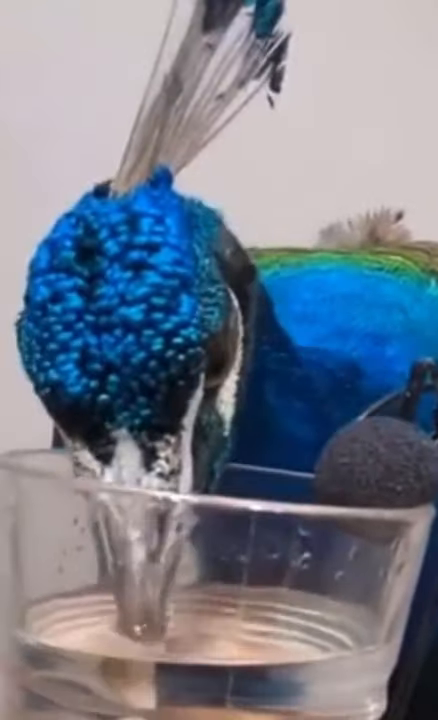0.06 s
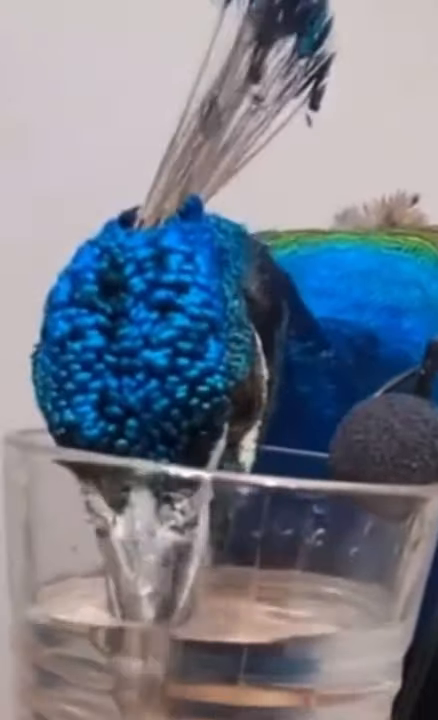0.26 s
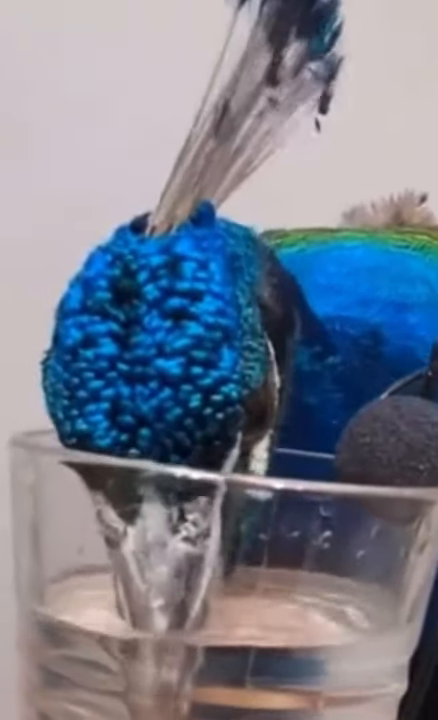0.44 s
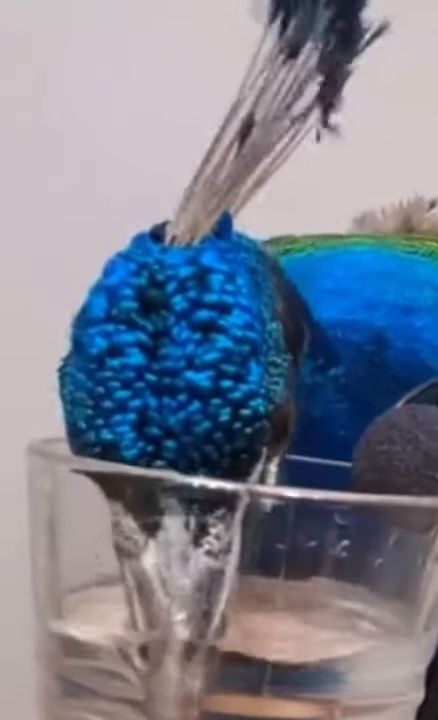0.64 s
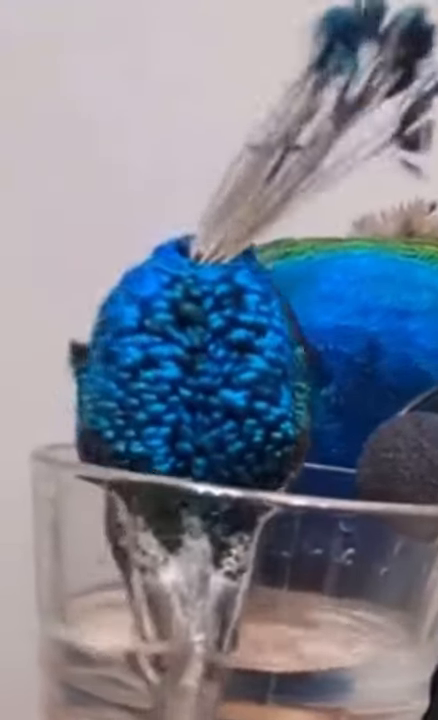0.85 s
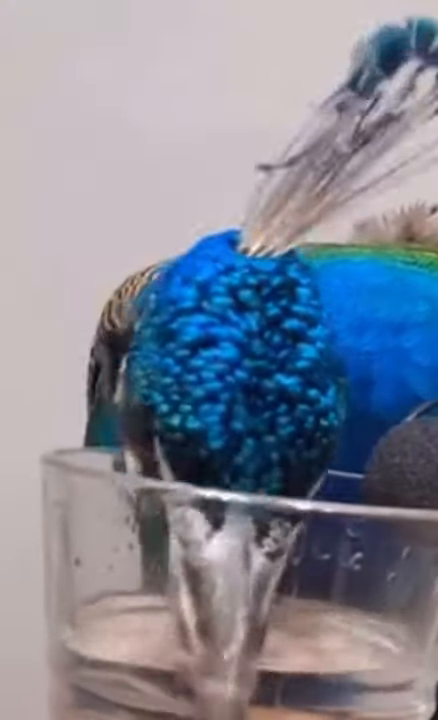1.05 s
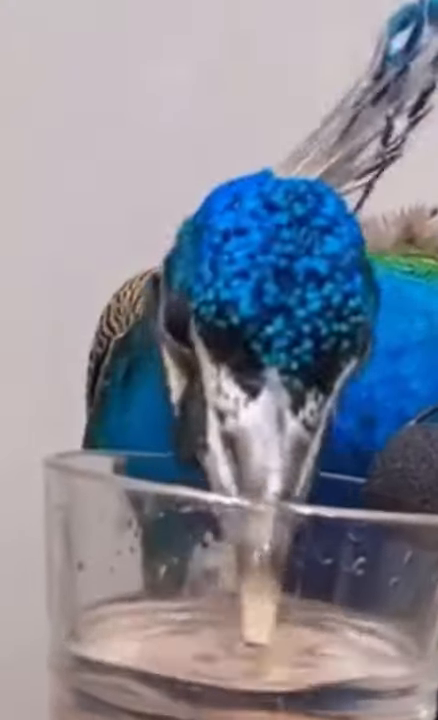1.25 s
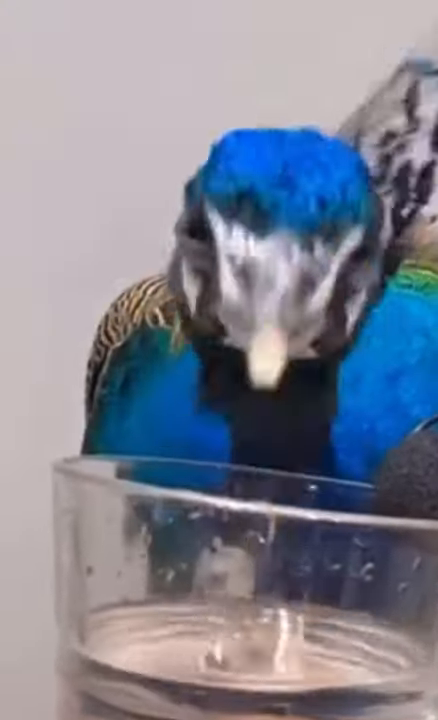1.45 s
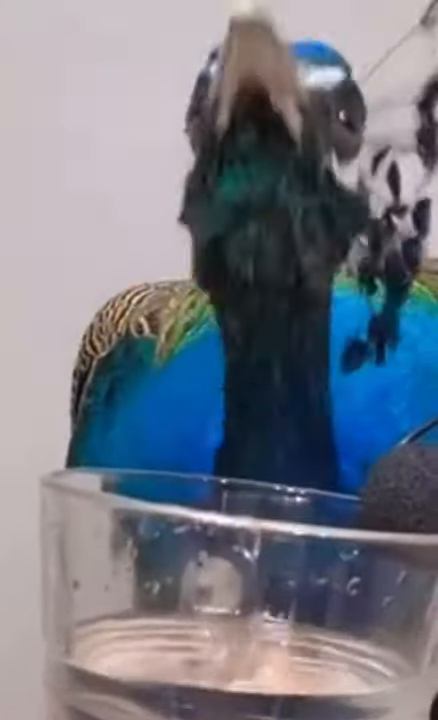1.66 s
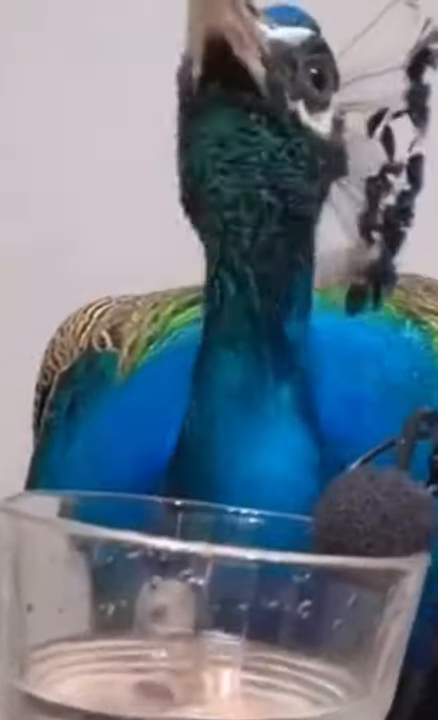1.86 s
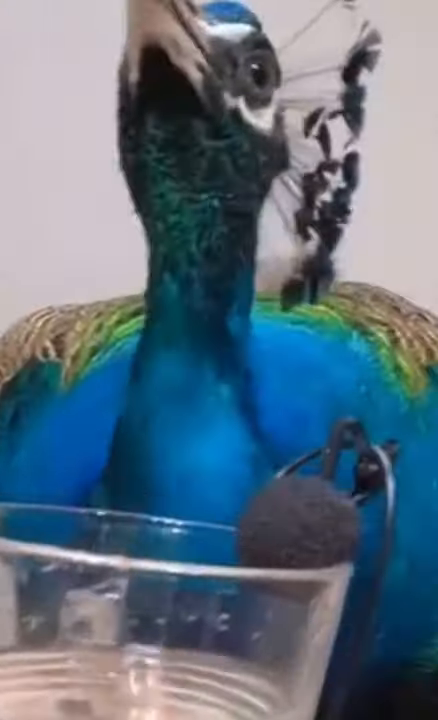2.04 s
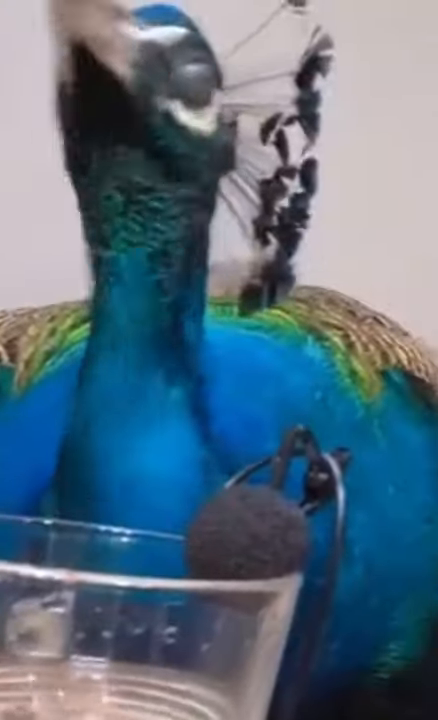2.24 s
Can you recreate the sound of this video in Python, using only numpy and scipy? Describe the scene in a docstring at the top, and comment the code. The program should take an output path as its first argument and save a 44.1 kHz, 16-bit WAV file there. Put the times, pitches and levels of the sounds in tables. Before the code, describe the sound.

Close, rapid wet clicking of a peacock sipping water from a glass, followed by fading gulps.

```python
"""A peacock drinks from a glass, close by, over a low rumble and faint hiss. First its beak works in the
water about ten times a second: snapping water films set the mouth ringing with sharp clicks, and short
swishes of grainy noise swell and fade around them. Soon water squeaks through a narrow gap, and now
and then the beak taps the glass into vibration. Then the bird lifts its head and swallows in fading
gulps, which sound at the lower resonance of the throat."""
import sys
import numpy as np
from scipy import signal
from scipy.fft import rfft, irfft
from scipy.io import wavfile

SR = 44100
rng = np.random.default_rng(int(sys.argv[2]) if len(sys.argv) > 2 else 0)


def materialize(psi):
    """Save the field psi as 16-bit PCM at rate SR to the path in sys.argv[1].

    A 1-D psi becomes a single channel; in a 2-D psi each row is a channel.
    """
    bounded = np.clip(np.atleast_2d(psi).T, -1, 1)
    quanta = np.round(bounded * 32767).astype(np.int16)
    wavfile.write(sys.argv[1], SR, quanta)


N = 101429

# Envelopes of the microphone rumble and the stirring water. Each row: time in seconds, level in dB.
RUMBLE_LEVELS = [(0, -46.5), (.3, -38.5), (.55, -44.5), (.72, -40), (1.3, -48), (1.6, -56), (2.3, -58)]
STIR_LEVELS = [(0, -60), (.18, -69), (.25, -59.5), (.39, -57), (.51, -57.5), (.75, -56), (1.15, -56),
               (1.33, -57.5), (1.42, -68), (2.3, -79.5)]
# Spectra of rumble, stirring water and room hiss. Each row: frequency in Hz, relative density in dB.
RUMBLE_SPECTRUM = [(15, 4), (30, 4), (55, -8.5), (100, -14), (200, -28.5), (400, -46.5), (1000, -49)]
STIR_SPECTRUM = [(100, 12), (500, -31), (900, 0.5), (1600, 4), (2400, -7.5), (4200, -14), (6000, -16.5),
                 (8000, -16), (13000, -35)]
HISS_SPECTRUM = [(100, 3), (220, -9.5), (350, -1), (520, -20.5), (1400, -12), (2800, -25.5), (10500, -26),
                 (13000, -27.5)]
# Bumps against the glass. Each row: peak time in seconds, frequency in Hz, level in dB.
BUMPS = [(.7, 55, -31), (.996, 60, -27), (1.189, 55, -27), (1.185, 130, -27), (1.291, 65, -35),
         (1.383, 120, -35)]
# Taps of the beak on the glass. Each row: start in seconds, level in dB.
TAPS = [(.6166, -35), (.7175, -39), (.8003, -39), (.889, -41), (.9041, -40), (.9973, -36), (1.188, -41)]
# Modes of the glass. Each list in turn: frequency in Hz, relative level in dB, 60 dB decay in seconds.
GLASS_HZ = [2050, 4870, 5150, 6130, 8650, 9380]
GLASS_DB = [-3.5, -2, -2.5, -10, -2, -5.5]
GLASS_T60_S = [.06, .05, .035, .04, .025, .036]
# Swallows. Each row: peak time, rise and fall in seconds, throat resonance in Hz, then the levels of
# throat, overtone and fizz in dB.
GULPS = [(1.406, 0.046, 0.034, 637, -45, -51, -63.5), (1.468, 0.021, 0.03, 784, -41, -48, -49.5),
         (1.492, 0.016, 0.031, 638, -35.5, -49, -81), (1.597, 0.038, 0.029, 625, -37.5, -56, -72.5),
         (1.7, 0.05, 0.049, 703, -45.5, -60.5, -74), (1.827, 0.032, 0.033, 793, -49, -53, -64.5),
         (1.974, 0.04, 0.024, 817, -48.5, -59.5, -63), (2.145, 0.022, 0.018, 820, -56, -65, -77)]
# Bursting water films. Each row: peak time in seconds, rise and equal fall in seconds, level in dB.
FILMS = [(0.199, 0.0037, -47.5), (0.756, 0.021, -50.5), (1.137, 0.0063, -54.5), (1.251, 0.023, -47.5),
         (1.538, 0.006, -59), (1.641, 0.017, -55), (1.946, 0.013, -64)]
# Squeaks of water. Each row: peak time in seconds, rise and equal fall in seconds, resonance in Hz,
# half width as a share of that frequency, level in dB.
SQUEAKS = [(.453, 0.02, 3370, 0.03, -38), (.453, 0.02, 5040, 0.05, -41.5),
           (.565, 0.021, 6100, 0.064, -33.5), (.794, 0.014, 3550, 0.022, -40),
           (1.288, 0.019, 1960, 0.061, -36.5), (1.315, 0.061, 5370, 0.12, -53.5)]
# Single bubbles. Each row: start in seconds, frequency in Hz, 60 dB decay in seconds, level in dB.
BUBBLES = [(0.7857, 6280, 0.01, -28), (1.2456, 5600, 0.0043, -40), (1.3831, 1750, 0.0062, -26),
           (1.967, 832, 0.045, -46.5)]
# Bands of a click: knock, snap, tick and spray. Each row: lower and upper edge in Hz.
CLICK_BANDS = [(330, 990), (2350, 3760), (4900, 6600), (7700, 11100)]
# Short swishes of grainy noise that swell and fade around the clicks. Each row: peak time, rise and
# fall in seconds, centre in Hz, then the levels of the centre, bass, middle and three treble bands in dB.
SWISHES = [(0.01, 0.023, 0.046, 1750, -52, -66, -67, -61, -63, -64),
           (0.058, 0.013, 0.013, 1610, -49, -47.5, -50, -49.5, -54, -58),
           (0.099, 0.0094, 0.014, 1480, -44, -50, -54, -69, -72, -73),
           (0.134, 0.056, 0.044, 1730, -48.5, -73, -56, -60, -55.5, -66),
           (0.223, 0.025, 0.025, 1500, -41.5, -52, -59, -53, -77, -81),
           (0.274, 0.052, 0.023, 1750, -47.5, -54, -53, -62, -60, -70),
           (0.336, 0.0066, 0.025, 1490, -30, -42, -47, -52, -56, -66),
           (0.457, 0.021, 0.019, 1440, -23.5, -45, -68, -69, -60, -59),
           (0.476, 0.026, 0.019, 1230, -32.5, -45.5, -55, -59, -54.5, -51),
           (0.568, 0.027, 0.036, 1405, -32, -45, -47.5, -43, -53, -57),
           (0.587, 0.019, 0.018, 1380, -26.5, -59, -57, -41, -47.5, -67),
           (0.617, 0.0095, 0.018, 1480, -49, -35.5, -55, -59, -48, -63),
           (0.686, 0.037, 0.024, 1800, -38, -38, -50, -49, -51, -55),
           (0.719, 0.0078, 0.0077, 1600, -57, -36, -54, -53, -55, -77),
           (0.778, 0.013, 0.026, 1370, -33, -46, -72, -69, -51, -51),
           (0.798, 0.012, 0.024, 1610, -36.5, -34.5, -40.5, -39.5, -46, -52),
           (0.897, 0.025, 0.024, 1540, -36.5, -34.5, -49, -42.5, -45, -48),
           (0.993, 0.02, 0.021, 1620, -38, -34.5, -39, -44, -47, -49),
           (1.087, 0.026, 0.025, 1665, -25.5, -35, -37, -41.5, -43.5, -50),
           (1.191, 0.014, 0.023, 1600, -33, -32, -30, -59, -50.5, -51),
           (1.285, 0.029, 0.034, 1580, -37, -40.5, -35.5, -54, -51.5, -55)]
# Wet clicks of beak and tongue. Each row: start in seconds, mouth resonance in Hz, then the levels of
# ring, knock, snap, tick and spray in dB.
CLICKS = [(0.0437, 1190, -74, -66, -49, -50.5, -44.5), (0.0481, 980, -46.5, -55, -59, -55, -51),
          (0.1043, 1847, -41, -51, -51, -58, -71), (0.1299, 1420, -49, -53, -53, -44, -70),
          (0.2228, 1424, -31, -58, -59, -60, -69), (0.2336, 1570, -42.5, -46.5, -54, -63, -69),
          (0.2565, 1680, -47, -63, -46, -65, -72), (0.275, 1620, -40, -47.5, -75, -47.5, -62),
          (0.2966, 1870, -42.5, -70, -59, -54.5, -59), (0.3342, 1450, -27, -44.5, -64, -52, -57),
          (0.3386, 1670, -27.5, -56, -36.5, -41.5, -40.5), (0.3492, 1500, -52, -57, -49, -63, -64),
          (0.4177, 1580, -42.5, -52, -68, -71, -79), (0.46, 1373, -22.5, -41, -30, -41, -68),
          (0.5421, 1350, -43, -64, -58, -53, -72), (0.5731, 1476, -19, -45, -30, -21.5, -68),
          (0.5943, 1340, -25.5, -40, -37, -59, -67), (0.6164, 1510, -32.5, -34, -32.5, -57, -60),
          (0.6649, 2070, -27.5, -50, -46, -37.5, -59), (0.6774, 1640, -19.5, -55, -26.5, -27, -32.5),
          (0.6922, 1830, -35, -59, -55, -58, -62), (0.7008, 2160, -42, -64, -47, -68, -72),
          (0.7171, 1550, -28.5, -43.5, -37.5, -46, -49), (0.7825, 1600, -21, -54, -29, -27.5, -20.5),
          (0.7992, 1870, -31, -40, -28, -36.5, -43), (0.8904, 1700, -26.5, -55, -45, -38.5, -44),
          (0.904, 1970, -31.5, -37.5, -34.5, -64, -52), (0.9853, 1600, -26, -33.5, -32.5, -38.5, -50),
          (0.9963, 1170, -30, -36, -38.5, -41, -43.5), (1.0456, 1880, -38, -63, -48, -40.5, -52),
          (1.0488, 1730, -35.5, -67, -47.5, -63, -55), (1.0932, 1580, -20.5, -43.5, -36.5, -58, -62),
          (1.183, 1120, -25.5, -29, -36.5, -40.5, -54), (1.1876, 960, -27, -42, -51, -55, -46),
          (1.1954, 1590, -24.5, -48, -71, -59, -64), (1.2054, 1470, -35.5, -51, -61, -63, -68),
          (1.293, 1120, -33, -49, -69, -54, -60), (1.3843, 950, -22.5, -55, -58, -55.5, -55.5),
          (1.4727, 837, -26.5, -54, -63, -39, -57), (1.4924, 585, -25.5, -34.5, -85, -53.5, -75),
          (1.8283, 810, -43.5, -49, -60, -79, -67), (1.98, 820, -41, -54, -91, -66, -72),
          (2.2741, 1370, -42.5, -54, -60.5, -67, -75), (2.2905, 1390, -43, -49, -59.5, -63, -74)]

GRAINS_PER_S, GRAIN_SPREAD_DB, SMOOTH_SHARE = 3000, 2.5, 0.63
RING_CYCLES, RING_ATTACK_S, CHIRP_PER_S = 10.45, 0.00044, 4.2   # the mouth decays 60 dB in RING_CYCLES
KNOCK_T60_S, CRACK_T60_S, CRACKLE_SHARE = 0.012, 0.008, 0.087
MEAN_REBOUND_S, REBOUND_SHARE = .0007, 0.56


def from_db(db):
    """Amplitude grows tenfold with every 20 dB."""
    return 10 ** (np.asarray(db) / 20)


def rms_one(x):
    """Division by the rms value gives a signal unit power."""
    return x / np.sqrt(np.mean(x ** 2) + 1e-20)


def band(x, low, high, order=2):
    """A causal band-pass filter attenuates what lies outside its edges in Hz."""
    sections = signal.butter(order, [low, min(high, .45 * SR)], "band", fs=SR, output="sos")
    return signal.sosfilt(sections, x + 1e-18)


def around(hz, half_width):
    """The edges of a band lie at equal ratios below and above its centre."""
    return hz / (1 + half_width), hz * (1 + half_width)


def add(out, start_s, x):
    """Sounds superpose: x adds to out from start_s on."""
    i = int(round(start_s * SR))
    x, i = x[max(-i, 0):], max(i, 0)
    out[i:i + len(x)] += x[:max(N - i, 0)]


def level(curve):
    """Straight lines between (s, dB) points give a piecewise exponential envelope."""
    return from_db(np.interp(np.arange(N) / SR, *np.transpose(curve)))


def coloured(noise, spectrum):
    """Spectral weighting colours a steady noise; the result has unit power."""
    hz, db = np.transpose(spectrum)
    bin_hz = np.maximum(np.fft.rfftfreq(N, 1 / SR), 1)
    gain = from_db(np.interp(np.log(bin_hz), np.log(hz), db)) * (bin_hz > 10)
    return rms_one(irfft(rfft(noise) * gain, N))


def grains(size):
    """Tiny, uneven impulses form shot noise on top of a smooth noise."""
    strengths = from_db(GRAIN_SPREAD_DB * np.minimum(rng.exponential(1, size), 4))
    signs = rng.choice([-1, 1], size)
    present = rng.random(size) < GRAINS_PER_S / SR
    return rms_one(strengths * signs * present) + SMOOTH_SHARE * rng.standard_normal(size)


def swell(peak_s, rise_s, fall_s, bands):
    """An envelope 0.4 s long modulates grains in bands given as ((low Hz, high Hz), peak dB)."""
    t = np.arange(-SR // 5, SR // 5) / SR
    distance = np.where(t < 0, -t / rise_s, t / fall_s)   # 1 lies 20 dB below the peak
    envelope = from_db(-20 * distance ** 1.203)
    out = np.zeros(N)
    for edges, db in bands:
        noise = band(grains(len(t)), *edges) * envelope
        add(out, peak_s + t[0], from_db(db) * rms_one(noise) * np.sqrt(np.mean(envelope ** 2)))
    return out


def burst(x, db, hold_s=.004):
    """Energy is power times duration: a transient gets the energy of level db held for hold_s."""
    return from_db(db) * x * np.sqrt(hold_s * SR / np.sum(x ** 2))


def ring(t, hz, t60):
    """A small air pocket is a damped oscillator, here rising in pitch as it dies away."""
    phase = 2 * np.pi * hz * t * (1 + CHIRP_PER_S * t)
    attack = 1 - np.exp(-t / RING_ATTACK_S)
    return np.sin(phase) * from_db(-60 * t / t60) * attack


def background(hiss_db=-61, whine_hz=10460, whine_db=-80):
    """Stirring water, the rustle of the stretching neck, rumble, hiss and a faint whine superpose."""
    stir = level(STIR_LEVELS) * coloured(grains(N), STIR_SPECTRUM)
    rumble = level(RUMBLE_LEVELS) * coloured(rng.standard_normal(N), RUMBLE_SPECTRUM)
    rustle = swell(peak_s=1.98, rise_s=0.5, fall_s=0.3, bands=[((117, 417), -59.5)])
    whine = from_db(whine_db) * np.sin(2 * np.pi * whine_hz * np.arange(N) / SR)
    hiss = from_db(hiss_db) * coloured(rng.standard_normal(N), HISS_SPECTRUM)
    return stir + rustle + rumble + whine + hiss


def bumps(half_width_cycles=0.52):
    """A bump on the glass reaches the microphone as one low swing under a Gaussian envelope."""
    out, t = np.zeros(N), np.arange(N) / SR
    for peak_s, hz, db in BUMPS:
        cycles = (t - peak_s) * hz
        out += from_db(db) * np.cos(2 * np.pi * cycles) * np.exp(-(cycles / half_width_cycles) ** 2)
    return out


def glass_taps(spread_db=2):
    """An impact excites each normal mode of the glass with its own strength; all decay exponentially."""
    out, t = np.zeros(N), np.arange(SR // 6) / SR
    for start_s, tap_db in TAPS:
        for hz, mode_db, t60 in zip(GLASS_HZ, GLASS_DB, GLASS_T60_S):
            struck_db = tap_db + mode_db + spread_db * rng.standard_normal()
            add(out, start_s, from_db(struck_db - 60 * t / t60) * np.sin(2 * np.pi * hz * t))
    return out


def gulps(overtone_hz=(1100, 1944.4), fizz_hz=(4320, 8300)):
    """Swallowed water excites the throat, a cavity that resonates lower than the mouth."""
    out = np.zeros(N)
    for peak_s, rise_s, fall_s, throat_hz, *levels_db in GULPS:
        edges = [around(throat_hz, half_width=0.19), overtone_hz, fizz_hz]
        out += swell(peak_s, rise_s, fall_s, zip(edges, levels_db))
    return out


def films(fizz_hz=(4830, 11100)):
    """Thin water films rupture at the edge of the beak and radiate puffs of high noise."""
    return sum(swell(peak_s, ramp_s, ramp_s, [(fizz_hz, db)]) for peak_s, ramp_s, db in FILMS)


def squeaks():
    """Water squeezed through a gap excites a narrow resonance, which gives its noise a pitch."""
    return sum(swell(peak_s, ramp_s, ramp_s, [(around(hz, half_width), db)])
               for peak_s, ramp_s, hz, half_width, db in SQUEAKS)


def bubbles():
    """Each bubble rings once in free, damped oscillation."""
    out, t = np.zeros(N), np.arange(SR // 20) / SR
    for start_s, hz, t60, db in BUBBLES:
        add(out, start_s, burst(ring(t, hz, t60), db))
    return out


def swishes(bass_hz=(60, 241), middle_hz=(516, 1055)):
    """Amplitude modulation: six bands of grainy noise swell and fade around the clicks."""
    out = np.zeros(N)
    for peak_s, rise_s, fall_s, centre_hz, *levels_db in SWISHES:
        edges = [around(centre_hz, half_width=0.18), bass_hz, middle_hz, *CLICK_BANDS[1:]]
        out += swell(peak_s, rise_s, fall_s, zip(edges, levels_db))
    return out


def clicks():
    """Impulse excitation: a water film snaps and rebounds in a broadband crack, and the mouth rings."""
    out, t = np.zeros(N), np.arange(SR // 25) / SR
    decays_s = [KNOCK_T60_S] + 3 * [CRACK_T60_S]
    for start_s, mouth_hz, ring_db, *levels_db in CLICKS:
        add(out, start_s, -burst(ring(t, mouth_hz, RING_CYCLES / mouth_hz), ring_db))
        impulses = np.zeros(len(t))
        impulses[0] = 1
        rebound_s = MEAN_REBOUND_S * (.5 + rng.random())
        impulses[np.searchsorted(t, rebound_s)] -= REBOUND_SHARE
        for edges, db, t60 in zip(CLICK_BANDS, levels_db, decays_s):
            crackle = CRACKLE_SHARE * rng.standard_normal(len(t)) * from_db(-60 * t / t60)
            add(out, start_s, burst(band(impulses + crackle, *edges), db))
    return out


def scene():
    """All the sounds add linearly in one channel."""
    foreground = clicks() + bubbles() + swishes() + squeaks() + films() + gulps()
    return (foreground + glass_taps() + bumps() + background())[None]


def record(dry):
    """An elliptic low-pass filter cuts the highest treble steeply."""
    cutoff_hz = 13200
    return signal.sosfilt(signal.ellip(10, .2, 70, cutoff_hz, fs=SR, output="sos"), dry)


dry = scene()
out = record(dry)
materialize(out)
```